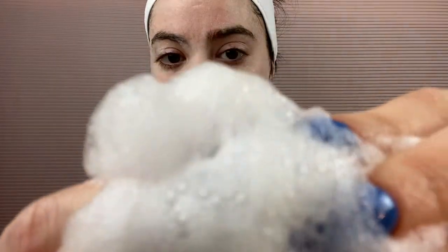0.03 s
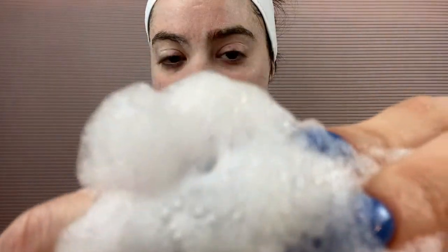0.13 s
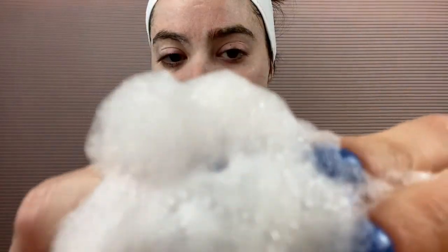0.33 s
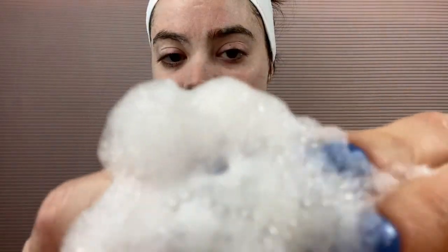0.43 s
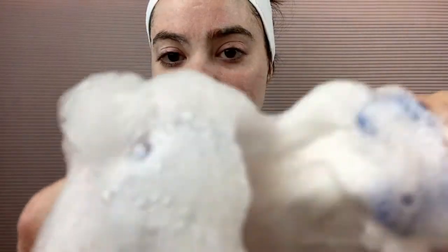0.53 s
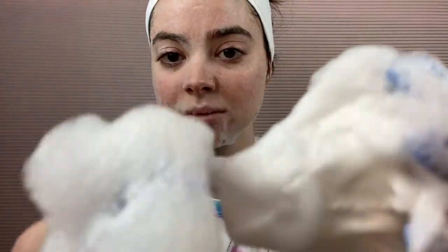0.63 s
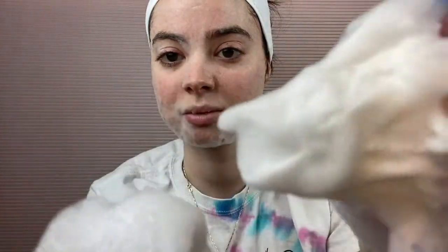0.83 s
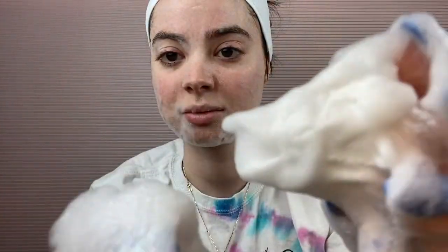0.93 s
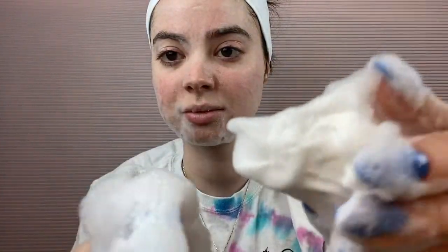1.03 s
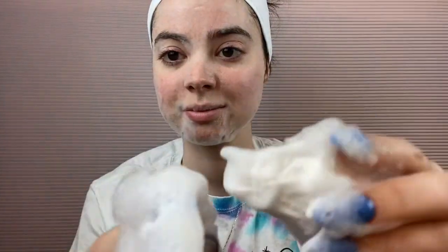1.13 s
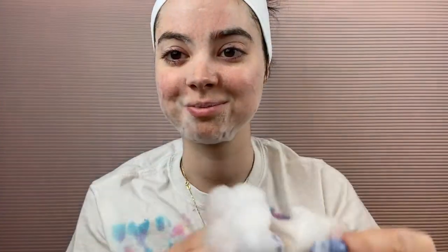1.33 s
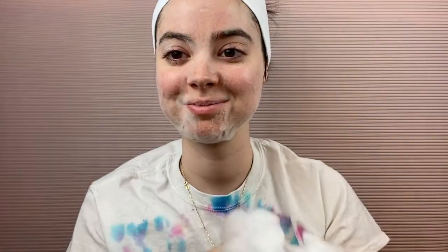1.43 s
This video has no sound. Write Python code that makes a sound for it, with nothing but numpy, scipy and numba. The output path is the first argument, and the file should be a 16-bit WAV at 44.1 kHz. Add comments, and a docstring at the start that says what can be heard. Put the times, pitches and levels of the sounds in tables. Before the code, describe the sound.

Foam fizzes softly from the start, very close and mostly on the right. From about 0.2 to 0.5 seconds it crackles and squelches in surges as hands pull it apart, with soft low thuds, a faint palm rub and one sharp snap at 0.3 seconds. Lighter crackling and small pops continue until about 1 second, then thin to a few ticks over faint room tone.

```python
"""A heap of foam, pulled apart by two hands right beside a stereo microphone in a quiet room.
Each bursting bubble rings for a few cycles: countless tiny ones fizz, middling ones crackle and big
wet ones squelch in the hollow of the hands, in surges as the foam tears. One air pocket snaps,
the hands thud and rub softly, and the fizz thins out as they draw away.
Behind it all lie a trace of wall echo and faint room tone."""
import sys
import numpy as np
from scipy import signal
from scipy.fft import rfft, irfft
from scipy.io import wavfile
from scipy.ndimage import uniform_filter1d
from numba import njit

SR = 44100
rng = np.random.default_rng(int(sys.argv[2]) if len(sys.argv) > 2 else 0)


def store_pcm(level_fs):
    """Save levels as 16-bit WAV."""
    pcm = np.round(np.clip(level_fs, -1, 1) * 32767).astype(np.int16)
    wavfile.write(sys.argv[1], SR, np.atleast_2d(pcm).T)


N = 66150
FFT_SIZE = 2 * N
FREQ = np.maximum(np.arange(N + 1) * SR / FFT_SIZE, 1)
T = np.arange(N) / SR

# kinds of bubble: bursts per second, f/Hz, spread/octaves, ring/cycles, size scatter/dB
FINE = (4200, 10350, 0.59, 1.4, 7.1)
MIDDLING = (2800, 2640, 0.59, 5, 3.5)
WET = (1400, 1310, 0.37, 2.6, 3.8)
# steady bursting under the fingers: t/s, fine level/dB, middling level/dB, wet level/dB
STEADY_BURSTING = [(0, -53, -56.5, -53), (.11, -50, -57.5, -67), (.155, -58.5, -66.5, -70),
                   (.2, -51.5, -78, -59), (.22, -54, -51, -51), (.29, -75, -48, -45.5),
                   (.36, -56, -62, -49.5), (.42, -66, -44.5, -47), (.49, -56.5, -53, -46.5),
                   (.53, -53, -53.5, -68), (.58, -63, -59, -60), (.64, -53, -53.5, -60),
                   (.69, -55, -48.5, -59.5), (.75, -54, -54.5, -62), (.8, -51.5, -54.5, -68),
                   (.865, -56, -54, -72), (.93, -57.5, -60, -77), (0.991, -62, -62, -74),
                   (1.04, -82, -73, -77), (1.1, -64.5, -85, -76), (1.18, -62, -64.5, -87),
                   (1.241, -67, -101, -94), (1.5, -67.5, -96, -84)]
# the foam tears: crest t/s, rise/s, fall/s, fine level/dB, middling level/dB, wet level/dB
FOAM_TEARS = [(0.237, 0.0079, 0.007, -43.5, -39.5, -36.5), (0.3082, 0.0011, 0.0011, -66, -35, -25.5),
              (.389, 0.0027, 0.0034, -38.5, -42.5, -54), (0.435, 0.0064, 0.01, -70, -40, -35.5),
              (0.465, 0.0034, 0.0072, -39, -39, -51), (0.546, 0.0068, 0.0038, -46.5, -45, -74),
              (0.681, 0.0027, 0.0065, -39.5, -81, -53), (0.814, 0.0022, 0.0042, -36, -52, -58),
              (0.843, 0.0064, 0.0097, -42, -50.5, -54.5), (1.094, .002, 0.0032, -47, -84, -62.5)]
# single larger bubbles: t/s, f/Hz, level/dB, ring/cycles
BUBBLE_POPS = [(0.0944, 11040, -21, 1.6), (0.1775, 4700, -26.5, 2), (0.204, 9000, -28, 1.7),
               (.2180, 1140, -30.5, 6.2), (0.2285, 1220, -27, 4.9), (0.2364, 1100, -23, 5.2),
               (.2368, 3370, -19.5, 2.3), (.2607, 1350, -30, 3.7), (.2680, 2770, -27, 2.9),
               (0.3039, 1600, -16.5, 3.9), (0.3066, 1100, -18.5, 3.7), (0.3859, 6000, -22.5, 1.5),
               (0.4292, 2870, -23.5, 11), (0.4339, 1960, -23.5, 19), (0.439, 1114, -24.5, 8.5),
               (.4420, 735, -29, 7.7), (0.4434, 1330, -25, 3.6), (0.4601, 3430, -15, 2.5),
               (0.481, 4500, -25.5, 2.4), (0.5327, 11000, -23, 1.8), (0.5504, 3260, -31, 8.8),
               (.613, 1870, -34, 7), (0.631, 11300, -25.5, 3.1), (.6843, 3940, -44, 3.2),
               (0.7009, 2130, -33, 7.2), (0.8164, 7100, -41, 1.7), (0.8215, 3300, -35, 5.4),
               (0.824, 1820, -31, 7.5), (0.855, 5530, -24, 2.3), (.8648, 3270, -34, 10),
               (0.8696, 3300, -36.5, 13), (0.8918, 5570, -25, 1.6), (.975, 8000, -26.5, 1.2),
               (.990, 8000, -29, 1.8), (1.0829, 11600, -31.5, 2.5), (1.160, 4420, -34, 1.04),
               (1.189, 7240, -27, 1.03)]
# resonances of the hollow between the hands: f/Hz, bandwidth/Hz, gain/dB
HOLLOW_MODES = [(1130, 300, 1.2), (1380, 140, 1.4)]
# spectrum of the bursting air pocket: f/Hz, level/dB
SNAP_SPECTRUM = [(200, -24.5), (700, -15.5), (1300, -2.5), (2200, 4), (4000, -3.5), (7000, -7), (11000, -7),
                 (16000, -23)]
# soft thuds of the hands: t/s, level/dB
HAND_THUDS = [(.229, -40), (0.305, -24.5), (.437, -34.5), (.456, -38.5)]
# spectrum of a thud: f/Hz, level/dB
THUD_SPECTRUM = [(20, -20), (45, -1), (70, -2.5), (105, 4.5), (150, -11.5), (220, -7), (400, -25),
                 (900, -49)]
# the palms rub together: crest t/s, rise/s, fall/s, level/dB
PALM_RUBS = [(.262, 0.0078, 0.015, -47), (0.454, 0.0063, .012, -35.5)]
# spectrum of the rubbing: f/Hz, level/dB
RUB_SPECTRUM = [(20, -23), (50, 6), (100, 0.5), (160, -10.5), (370, -2.5), (730, -15), (1500, -49)]
# spectrum of the room tone: f/Hz, level/dB
ROOM_SPECTRUM = [(20, -42), (40, -6.5), (60, 2), (110, 0), (160, -7), (220, -8.5), (350, -12.5), (700, -21),
                 (1400, -26.5), (4000, -28), (16000, -42.5)]
# the microphone's response to the foam at close range: f/Hz, gain/dB
MIC_RESPONSE = [(100, 13), (400, 7.5), (800, 1), (1200, -1), (2000, 0.5), (4000, 3), (7000, 0.5),
                (11000, 1.5), (16000, -5.5)]
# the microphone's left port against its right: f/Hz, gain/dB
LEFT_PORT = [(50, -20), (125, -2.5), (300, -15.5), (1100, -13), (2500, -16.5), (5000, -21.5), (7000, -1),
             (9000, 0), (12000, -0.5), (16000, 0)]

SNAP_S, SNAP_DB = .3143, -3.5
LEFT_LEAD_S, LEFT_THUD_LAG_S, SIDE_SCATTER_DB = 0.0001641, 0.002, 4
TEAR_SCATTER = .5  # share of the size scatter left while the foam tears
TOP_HZ = 16200  # highest bubble pitch, and the microphone's treble cut


def bubble_swarm(kind, column):
    """Bubbles of one kind burst at random between the ports, louder and more alike in every tear."""
    rate, centre_hz, octaves, cycles, scatter_db = kind
    levels = np.array(STEADY_BURSTING)
    steady = amp(np.interp(T, levels[:, 0], levels[:, 1 + column])) ** 2
    tearing = sum((amp(db[column]) * swell(crest, rise, fall)) ** 2
                  for crest, rise, fall, *db in FOAM_TEARS)
    power = steady + tearing
    when, chance = rng.random((8000, 2)).T
    bursting = chance < rate * N / SR / len(when)
    pitch, size, side = rng.standard_normal((len(when), 3))[bursting].T
    times = when[bursting] * N / SR
    hz = np.minimum(centre_hz * 2 ** (octaves * pitch), TOP_HZ)
    unevenness = TEAR_SCATTER + (1 - TEAR_SCATTER) * np.interp(times, T, steady / power)
    size_db = unevenness * scatter_db * size
    pan_db = SIDE_SCATTER_DB * side / 2
    pair = np.array([bubble_rings(times, hz, amp(size_db + s * pan_db), cycles) for s in (1, -1)])
    span = int(0.026 * SR)  # the bursts average out over 26 ms
    local_power = uniform_filter1d(uniform_filter1d((pair ** 2).mean(0), span), span)
    return pair * np.sqrt(power / (np.abs(local_power) + 1e-9))


def bubble_pops():
    """Larger bubbles stand out of the fizz: some tick, some ring."""
    times, hz, db, cycles = np.array(BUBBLE_POPS).T
    return bubble_rings(times, hz, amp(db), cycles[:, None])


def bubble_rings(times, hz, strength, cycles):
    """Each bubble rings as it bursts, dying away by 40 dB over its few cycles."""
    age = np.arange(int(SR * np.max(np.ravel(cycles) / hz)) + 2)
    index = np.ceil(times * SR).astype(int)[:, None] + age
    turns = hz[:, None] * age / SR
    fade = np.exp(-np.log(100) * turns / cycles)
    ring = np.cos(2 * np.pi * turns) * fade
    ring -= fade * ring.sum(1, keepdims=True) / fade.sum(1, keepdims=True)  # no net push of air
    return np.bincount(index.ravel(), (strength[:, None] * ring).ravel(), N)[:N]


def hand_hollow(wet, wander_octaves=0.082, shape_s=.04, direct_db=-6):
    """Wet bubbles ring the hollow between the hands, whose pitch wanders as the fingers move."""
    shapes = rng.standard_normal(200)
    shift = 2 ** (wander_octaves * np.interp(T / shape_s, np.arange(len(shapes)), shapes))
    ringing = sum(amp(db) * np.array([resonate(port, hz * shift, float(width)) for port in wet])
                  for hz, width, db in HOLLOW_MODES)
    return amp(direct_db) * wet + ringing


def air_push(at_s, db, spectrum):
    """One push of air, a snap or a thud; db sets its peak, allowing for the microphone's phase lag."""
    shape = gains(spectrum)
    peak = np.abs(irfft(shape * mic_phase_lag(), FFT_SIZE)).max()
    return amp(db) * irfft(shape * delay(at_s), FFT_SIZE)[:N] / peak


def hand_thuds():
    """Low bumps of the hands reach the left port a little later."""
    bumps = sum(air_push(at_s, db, THUD_SPECTRUM) for at_s, db in HAND_THUDS)
    return np.array([filt(bumps, delay(LEFT_THUD_LAG_S)), bumps])


def palm_rubs():
    """Skin slides on skin with a rough, low rustle."""
    rustle = filt(rng.standard_normal((2, N)), gains(RUB_SPECTRUM))
    envelope = sum(amp(db) * swell(crest, rise, fall) for crest, rise, fall, db in PALM_RUBS)
    return rustle / rustle.std() * envelope


def wall_echo(source, send_db=-15.5, decay_s=0.026, dull_hz=4040):
    """The walls return a short, dull trace of the close sound."""
    reflections = rng.standard_normal((2, N)) * np.exp(-T / decay_s)
    response = rfft(reflections, FFT_SIZE) / (1 + 1j * FREQ / dull_hz)
    return amp(send_db) * filt(source, response) / np.linalg.norm(reflections[0])


def room_tone(db=-58, crossover_hz=226):
    """The quiet room: a faint rumble alike at both ports, under a thin, wide hiss."""
    noise = rng.standard_normal((3, N))
    shared = 1 / (1 + (FREQ / crossover_hz) ** 2)
    rumble = filt(noise[0], gains(ROOM_SPECTRUM) * np.sqrt(shared))
    hiss = filt(noise[1:], gains(ROOM_SPECTRUM) * np.sqrt(1 - shared))
    tone = rumble + hiss
    return amp(db) * tone / tone.std()


def mic_phase_lag(lag_s=.02, reference_hz=100, slope=1.35, knee_hz=32):
    """Lows pass through the microphone late, so every click droops in pitch."""
    falloff = (reference_hz / np.hypot(FREQ, knee_hz)) ** (slope - 1)
    return np.exp(2j * np.pi * lag_s * reference_hz * falloff / (slope - 1))


@njit
def resonate(x, hz, width_hz):
    """Band-pass with a moving centre, gain 1 there."""
    y = np.empty(len(x))
    band_state, low_state = 0., 0.
    for i in range(len(x)):
        tuning = np.tan(np.pi * hz[i] / SR)
        damping = width_hz / hz[i]
        band = (band_state + tuning * (x[i] - low_state)) / (1 + tuning * (tuning + damping))
        band_state = 2 * band - band_state
        low_state += 2 * tuning * band
        y[i] = damping * band
    return y


def swell(crest, rise, fall):
    """Envelope that rises to a rounded crest and falls away."""
    return np.exp(1 - np.hypot(1, (T - crest) / np.where(T < crest, rise, fall)))


def amp(db):
    """Amplitude from decibels."""
    return 10 ** (np.asarray(db) / 20)


def gains(points):
    """Gain at every frequency from points of f/Hz, level/dB."""
    hz, db = np.array(points).T
    return amp(np.interp(np.log(FREQ), np.log(hz), db))


def filt(x, response):
    """Filter by a frequency response."""
    return irfft(rfft(x, FFT_SIZE) * response, FFT_SIZE)[..., :N]


def delay(seconds):
    """Response of a plain delay."""
    return np.exp(-2j * np.pi * FREQ * seconds)


def scene():
    """Foam and hands right at the two ports; wall echo and room tone behind them."""
    fizz = bubble_swarm(FINE, column=0)
    crackle = bubble_swarm(MIDDLING, column=1)
    squelch = hand_hollow(bubble_swarm(WET, column=2))
    foam = fizz + crackle + squelch + bubble_pops()
    snap = air_push(SNAP_S, SNAP_DB, SNAP_SPECTRUM)
    close = filt(foam, gains(MIC_RESPONSE)) + snap
    echo = wall_echo(close[1])
    left, right = close + hand_thuds() + palm_rubs()
    left = filt(left, gains(LEFT_PORT) * delay(-LEFT_LEAD_S))
    return np.array([left, right]) + echo + room_tone()


def record(dry):
    """The microphone delays the lows and cuts the top."""
    treble_cut = signal.ellip(8, .2, 70, TOP_HZ, fs=SR, output="sos")
    return signal.sosfilt(treble_cut, filt(dry, mic_phase_lag()))


dry = scene()
out = record(dry)
store_pcm(out)
```